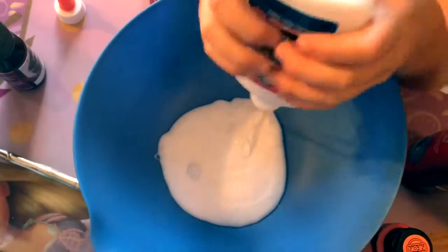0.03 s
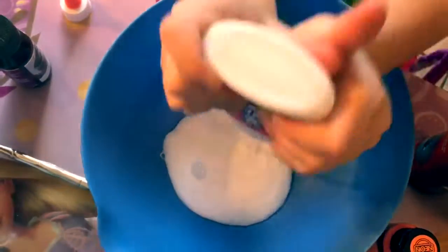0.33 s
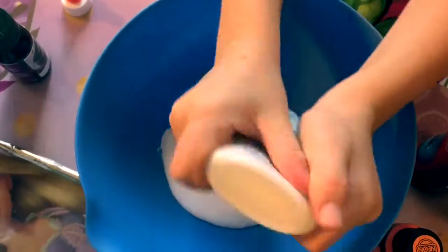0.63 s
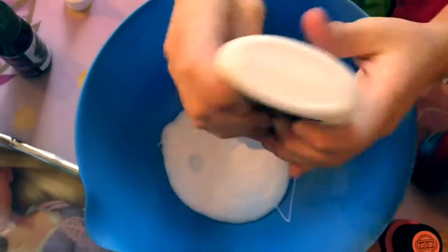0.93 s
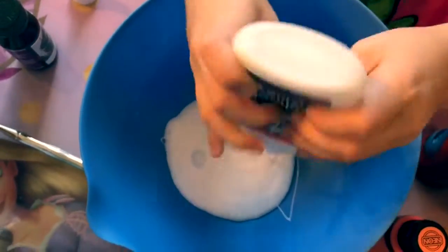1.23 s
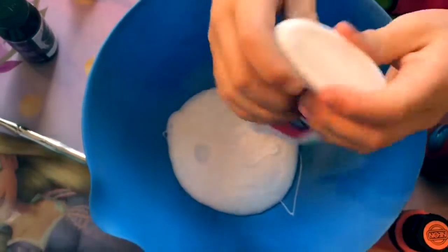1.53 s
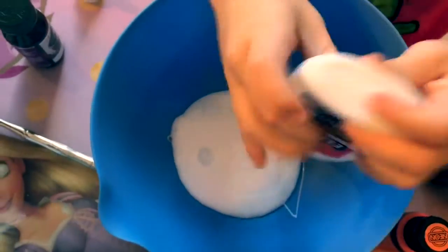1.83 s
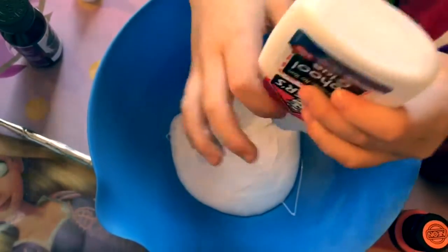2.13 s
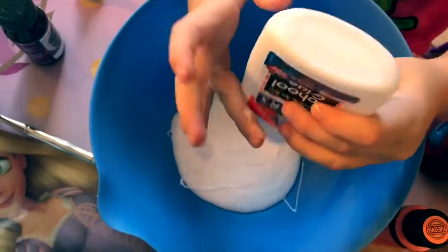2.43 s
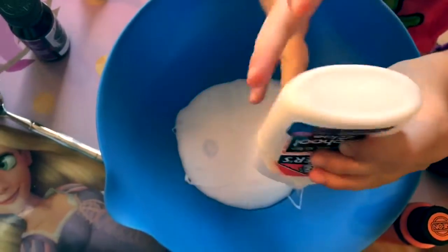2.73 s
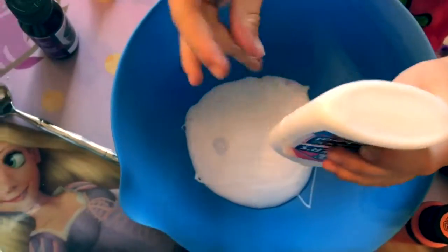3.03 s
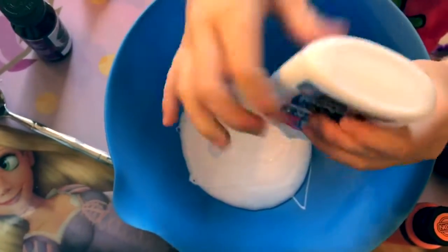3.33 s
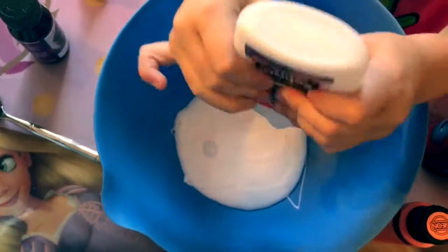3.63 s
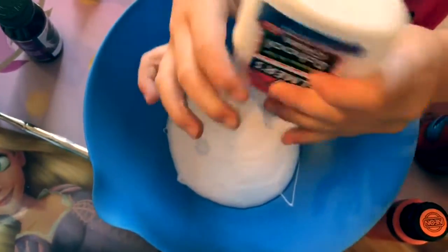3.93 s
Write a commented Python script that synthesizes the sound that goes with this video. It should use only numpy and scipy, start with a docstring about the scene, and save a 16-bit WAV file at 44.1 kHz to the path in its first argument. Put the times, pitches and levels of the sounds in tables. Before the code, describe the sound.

A plastic glue bottle is handled close to the microphone, clicking and crackling with short hollow thumps. Sharp clicks come in the first 0.3 seconds, followed by lighter scattered taps and faint finger rubbing, with firmer knocks near 2.1 and 2.7 seconds. Louder snaps and crackles cluster from 2.9 to 3.4 seconds and return at 3.9. A low hum runs underneath in the small, quiet room.

```python
"""Glue bottle over a mixing bowl

Close to the microphone, two hands turn, squeeze and pat an upside-down plastic glue bottle.
Skin rubs on the plastic, the wall flexes with hollow thumps, and cap and sticky fingers crackle.
The room is small and quiet, with a low hum, and rings briefly after each sound."""
import sys
import numpy as np
from scipy import signal
from scipy.fft import rfft, irfft, next_fast_len
from scipy.io import wavfile
from scipy.ndimage import uniform_filter1d

SR = 44100
rng = np.random.default_rng(int(sys.argv[2]) if len(sys.argv) > 2 else 0)


def generate_wav(signal):
    """Clip the signal to [-1, 1] and save it as 16-bit WAV at the path in sys.argv[1]."""
    frames = np.transpose(np.atleast_2d(signal))
    scaled = np.clip(frames, -1, 1) * 32767
    pcm = np.round(scaled).astype(np.int16)
    wavfile.write(sys.argv[1], SR, pcm)


N = 176400

# Still air in the room. Each row: frequency in Hz, relative level in dB.
AIR_SPECTRUM = [(15, -75.5), (25, -83), (80, -17), (137, -30.5), (166, -17.5), (277, -4.5), (317, -13.5),
                (354, -7.5), (476, -15), (641, -15), (818, -18.5), (1100, -23), (2000, -24.5),
                (2910, -31.5), (9070, -42), (14400, -46), (16000, -43)]
# The room's hum. Each row: centre in Hz, half-width in Hz, level in dB.
HUM_BANDS = [(76, 4.5, -61), (92, 12, -59), (129, 10.5, -65.5), (174, 3.7, -61), (349.1, 12.7, -51.5),
             (650, 4.5, -66), (880, 42, -69)]
# Fingers sliding on the plastic. Each row: peak time, rise and fall in seconds, level in dB,
# centre and width in Hz.
FINGER_STROKES = [(.005, 0.013, 0.066, -51, 6040, 7000), (.135, 0.0049, 0.015, -50.5, 3720, 1500),
                  (.595, 0.0099, 0.0054, -55.5, 3680, 1200), (.664, 0.0027, 0.016, -51.5, 10200, 9400),
                  (.81, 0.026, 0.009, -56.5, 5000, 7000), (1.005, .003, 0.023, -52, 11000, 8100),
                  (1.067, 0.01, 0.0093, -50, 7800, 910), (1.09, 0.016, 0.0089, -42, 6400, 1670),
                  (1.137, 0.0048, 0.0058, -41, 6040, 1000), (1.308, 0.0045, 0.038, -55, 9800, 12100),
                  (1.47, 0.098, 0.036, -70.5, 1080, 1420), (1.55, .025, 0.017, -63, 13900, 4000),
                  (2.36, 0.015, 0.016, -58.5, 3000, 4950), (2.561, 0.0046, 0.049, -59, 10700, 10100),
                  (3.083, 0.0037, 0.0085, -42, 12800, 5060), (3.619, 0.0048, 0.0015, -45, 6980, 300),
                  (3.66, .008, 0.042, -49, 8400, 1210), (3.779, 0.0025, 0.022, -36.5, 12500, 800),
                  (3.852, 0.045, 0.11, -49, 2780, 5000), (3.93, .01, .03, -43, 12500, 2020)]
# Flexes of the bottle wall. Each row: start in seconds, pitch in Hz, level in dB, swell in ms.
WALL_FLEXES = [(0.0785, 527, -10.5, 1.43), (0.135, 388, -15, 2.8), (.2470, 332, -24, 2.2),
               (0.259, 370, -15, 2.15), (0.4478, 390, -14, 3.1), (0.759, 380, -32.5, 2.7),
               (.8480, 335, -22, 2.53), (1.014, 343, -39, 2.3), (1.1440, 290, -21.5, 2.26),
               (1.692, 413, -31, 3.4), (1.8705, 298, -22.5, 5.4), (2.0567, 353, -14.5, 2.8),
               (2.6948, 407, -13.5, 1.43), (2.9701, 316, -21, 2.05), (3.1020, 437, -18, 1.8),
               (3.109, 269, -15.5, 2.6), (3.2440, 440, -19.5, 1.8), (3.2518, 370, -14.5, 2),
               (3.292, 302, -24.5, 4.2), (3.3790, 310, -9.5, 1.7), (3.646, 236, -35.5, 3.2),
               (3.9107, 390, -19.5, 2.9), (3.915, 319, -10, 1.84), (3.9196, 212, -24.5, 3.8)]
# Crackles of cap and bottle. Each row: peak time in seconds, rise and fall in ms, levels of the
# body, middle, edge and fizz bands (low to high) in dB, ring pitch in Hz, ring level in dB.
CAP_CLICKS = [(.0797, 0.45, 0.55, 24, 0.5, -44, -32, 3250, 0),
              (0.0802, 0.32, 1.3, 20, -23, -24, -25, 2530, 3.5),
              (0.2477, 1.7, 1.4, -10, -5, -9, -2, 9800, -5), (0.253, 1.6, 7.5, 15.5, 0, 3, 8.5, 7200, -2),
              (.2605, 1.2, 1.5, 7, -3, 2.5, 7, 4200, -6), (.2660, 1.4, 9, -18, -1.5, -1.5, 9, 7300, 10.5),
              (0.761, 0.37, 1.2, -2.5, -35, -25, -39, 6000, -39),
              (0.8554, 1.0, 5.1, -3, -8, -6.5, -3, 8500, -14),
              (0.858, 2.6, 2.5, -7, -5, -8.5, -4.5, 3940, 8),
              (0.861, 1.7, 2.5, 4.5, -11, -14.5, -13, 10800, -0.5),
              (1.0149, 0.33, 0.96, 4, -20, -18, -33, 6400, -18),
              (1.144, 1.9, 2.5, -2, -9, 0.5, -19.5, 6000, 3.5),
              (1.3086, 0.46, 4.7, -4.5, -19, -19.5, -25.5, 5700, -29),
              (1.34, .5, 1.5, -3, -21, -26.5, -33, 4000, -24),
              (1.4869, .3, 1.3, -4, -18, -32, -38, 1950, -20), (1.6930, 0.19, 2, 5, 2, -2, -8.5, 4150, -1),
              (1.7389, 0.25, 1.6, 3, 2, -15, -21, 1630, -8), (1.8718, .4, 1.3, 2, 0, -12, -20, 4270, 2.5),
              (1.8737, 1.3, 1.2, 5, -2, -5, -15, 1320, 4.5),
              (1.936, 1.0, 2.0, 3.5, -18, -23.5, -26, 4400, -17),
              (2.0561, 0.48, 1.13, 7.5, 3.5, 2.5, -3, 4110, 14),
              (2.0577, 0.69, 0.65, 5, 9, 9, -9, 1360, 11), (2.6975, 1.1, 3.0, 16, -1, -35, -35, 860, 1),
              (2.7063, 1.45, 2.9, 0, 0.5, -10, -10, 10800, 4), (2.7101, 2.4, 2.3, 6, 2, 2, -2.5, 3420, 4.5),
              (2.9147, 4.7, 3.2, 0, -19, -12.5, -9.5, 7000, -19),
              (2.924, 0.87, 2.4, -1, -20, -11, -10, 13900, -2),
              (2.9293, 0.86, 4.0, 5.5, -20, -3, -6, 10200, 3),
              (2.942, 8.2, 6.7, -20, -16, -7.5, 7.5, 6850, 4),
              (2.9640, 4.2, 5.6, 5.5, -8.5, 0.5, -2.5, 6170, 3),
              (3.0956, 0.75, 0.64, 14.5, -3, 8, -0.5, 7100, -7),
              (3.1030, 0.23, 1.5, 32.5, 11, 6.5, -10, 4800, 21), (3.1050, .5, 2.7, 0, 11, -5, -6, 1296, 18),
              (3.1079, 0.61, 0.55, 19.5, 2, 10.5, 8.5, 5700, 12),
              (3.1140, 3.5, 1.8, 1, -34, 9, 1, 6400, 9.5), (3.2442, .6, 4.5, 9, 1, -27, -3, 5100, -12),
              (3.2519, 0.083, 1.2, 22, 0, 15, 0, 4900, 20), (3.3702, 1.4, 3.8, 16, -12, -3, -1, 6400, -7),
              (3.3759, .4, 2.65, 25, 2, 12.5, 9, 5000, 17.5),
              (3.3785, 0.44, 2.4, -18, 16, 2, 12, 6650, 16.5), (3.385, 0.63, 3, -13, 3, -1, 8, 7300, -1),
              (3.6467, 5, 2.8, -2, -14, -4, 3.5, 5800, -1),
              (3.9118, 3.7, 0.99, 22.5, 1, -1, 9.5, 7800, 5.5),
              (3.916, 0.95, 4.6, 22.5, 6.5, 4, 9, 8400, 11)]
# Resonances of bottle and cap, heard in every click. Each row: centre and width in Hz, gain in dB.
PLASTIC_MODES = [(1746, 480, -2.5), (2480, 140, 1.5), (3230, 470, 3), (4520, 250, -5), (6470, 117, -33.5),
                 (8350, 133, -16.5), (10660, 170, -15.5), (14400, 1140, 8.5)]
# Tone of a fingertip letting go. Each row: frequency in Hz, gain in dB.
TICK_TONE = [(200, 3), (900, 16.5), (2500, 7), (6000, 3.5), (15000, -29.5)]
# Tone of the reflections. Each row: frequency in Hz, level in dB against the direct sound.
REFLECTION_TONE = [(100, -6), (330, -26), (550, -5.5), (720, -13.5), (870, -1), (1080, -11), (1400, -9),
                   (3000, -7.5), (6000, -9.5), (10000, -7), (16000, -13)]
# Resonances of bowl and room. Each row: pitch in Hz, gain in dB, T60 and delay in seconds.
BOWL_AND_ROOM_MODES = [(362, 0, .16, .0145), (326, -4, .18, .0155), (875, -12, .2, .008),
                       (975, -12, .18, .008)]


def undb(db):
    """Decibels to gain."""
    return 10 ** (np.asarray(db) / 20)


def unit_rms(x):
    """Scale to rms 1."""
    return x / np.sqrt(np.mean(x ** 2) + 1e-30)


def colour(x, points):
    """Causal, minimum-phase filter through (Hz, dB) points."""
    size = 2 * next_fast_len(len(x))
    hz, db = np.array(points, float).T
    freqs = np.maximum(np.fft.rfftfreq(size, 1 / SR), 1)
    gain = undb(np.interp(np.log(freqs), np.log(hz), db))
    cepstrum = irfft(np.log(gain))
    cepstrum[1:size // 2] *= 2
    cepstrum[size // 2 + 1:] = 0
    return irfft(rfft(x, size) * np.exp(rfft(cepstrum)))[:len(x)]


def flatten(burst):
    """Even out the broad spectrum of a burst and give it unit energy."""
    spectrum = rfft(burst)
    power = uniform_filter1d(np.abs(spectrum) ** 2, size=50)
    flat = irfft(spectrum / np.sqrt(power + 1e-12), len(burst))
    return flat / np.linalg.norm(flat)


def band(x, hz, width):
    """One resonance, gain 1 at its centre."""
    q = hz / min(width, SR / np.pi)
    return signal.lfilter(*signal.iirpeak(hz, q, fs=SR), x)


def add(out, x, start):
    """Mix x into out from a time in seconds."""
    i = int(round(start * SR))
    x, i = x[max(-i, 0):], max(i, 0)
    out[i:i + len(x)] += x[:max(len(out) - i, 0)]


def swell(t, rise, fall):
    """Steep rise up to t = 0, exponential fall after it."""
    return np.exp(-np.where(t < 0, np.abs(t / rise) ** 1.07, np.abs(t / fall)))


def room_tone(air_db=-52):
    """Still air all round the microphone, and narrow bands of noise that waver as a low hum."""
    out = undb(air_db) * unit_rms(colour(rng.standard_normal(N), AIR_SPECTRUM))
    freqs = np.fft.rfftfreq(N, 1 / SR)
    for hz, half_width, db in HUM_BANDS:
        hum_spectrum = rfft(rng.standard_normal(N)) / (1 + ((freqs - hz) / half_width) ** 2)
        out += undb(db) * unit_rms(irfft(hum_spectrum, N))
    return out


def finger_rubs(roughness=0.18):
    """Skin drags over the bottle in faint, grainy, sometimes squeaky strokes."""
    out, t = np.zeros(N), np.arange(N) / SR
    grain = np.exp(roughness * unit_rms(uniform_filter1d(rng.standard_normal(N), size=60)))
    for peak, rise, fall, db, hz, width in FINGER_STROKES:
        friction = rng.standard_normal(N) * grain
        drag = band(band(friction, hz, width), hz, 2 * width)
        out += undb(db) * swell(t - peak, rise, fall) * unit_rms(drag)
    return out


def wall_thumps():
    """The bottle wall flexes and, damped by the hand, swings for only a few cycles."""
    out, t = np.zeros(N), np.arange(SR // 20) / SR
    for start, hz, db, swell_ms in WALL_FLEXES:
        age = t * 1000 / swell_ms
        envelope = (age * np.exp(1 - age)) ** 3
        add(out, undb(db) * envelope * np.sin(2 * np.pi * hz * t), start)
    return out


def cap_clicks(roughness=0.54, grain_s=0.0004, lead_s=0.02):
    """Each click is a tight cluster of slips, coloured by the plastic, with a ring set by the grip."""
    out = np.zeros(N)
    t_ms = (np.arange(4096) / SR - lead_s) * 1000
    for peak, rise, fall, body, middle, edge, fizz, ring_hz, ring_db in CAP_CLICKS:
        slips, grain = rng.standard_normal((2, len(t_ms)))
        grain = unit_rms(uniform_filter1d(grain, int(grain_s * SR)))
        push = flatten(slips * np.exp(roughness * grain) * swell(t_ms, rise, fall))
        plastic = sum(undb(db) * band(push, hz, width) for hz, width, db in PLASTIC_MODES)
        shell = push + grip_resonances(push) + plastic
        tone = [(130, body - 16.5), (450, body - 2), (700, body - 2.5), (870, body), (1030, body - 2),
                (1260, middle), (1800, middle), (2600, (middle + edge) / 2 - 4.5),
                (3400, edge - 2), (6000, edge), (9000, fizz), (15000, fizz - 11.5)]
        crackle = colour(shell / np.linalg.norm(shell), tone)
        ring_width = 0.13 * ring_hz
        ring = band(band(push, ring_hz, ring_width), ring_hz, 4 * ring_width)
        ring *= undb(ring_db) * np.sqrt(np.pi * ring_width / SR) / np.linalg.norm(ring)
        add(out, crackle + ring, peak - lead_s)
    return out


def grip_resonances(push, low_hz=5000, high_hz=15500):
    """Every grip leaves other small, high resonances of the plastic free to ring."""
    pitches = rng.uniform(low_hz, high_hz, size=9)
    return undb(5) * sum(band(push, hz, width=300) for hz in pitches)


def sticky_ticks(per_second=12, count=200, fall_s=0.00066, spread_db=2):
    """Tacky fingertips let go of the plastic at random moments."""
    out, t = np.zeros(N), np.arange(SR // 100) / SR
    starts = rng.random(count) * count / per_second
    for start, db in zip(starts, rng.normal(-39, spread_db, count)):
        tick = rng.standard_normal(len(t)) * np.exp(-t / fall_s)
        add(out, undb(db) * tick / np.linalg.norm(tick), start)
    return colour(out, TICK_TONE)


def small_room(direct, early_t60_s=0.26, late_t60_s=0.63, late_db=-8.5):
    """Table and walls reflect quickly, a fainter tail lingers, and bowl and room ring low."""
    t = np.arange(int(0.8 * SR)) / SR
    early, late = (np.exp(-np.log(1000) * t / t60) / np.sqrt(t60) for t60 in (early_t60_s, late_t60_s))
    tail = rng.standard_normal(len(t)) * np.hypot(early, undb(late_db) * late)
    response = np.zeros(len(t))
    add(response, colour(tail / np.linalg.norm(tail), REFLECTION_TONE), start=0.0046)
    for hz, db, t60, delay in BOWL_AND_ROOM_MODES:
        decay_rate = np.log(1000) / t60
        mode = np.exp(-decay_rate * t) * np.sin(2 * np.pi * hz * t)
        add(response, undb(db) * 2 * decay_rate / SR * mode, delay)
    return direct + signal.fftconvolve(direct, response)[:N]


def scene(low_cut_hz=91):
    """One microphone close to the bottle, which is too small to radiate deep bass; the room behind."""
    handling = wall_thumps() + cap_clicks() + finger_rubs() + sticky_ticks()
    low_cut = signal.butter(2, low_cut_hz, "high", fs=SR, output="sos")
    bottle = signal.sosfilt(low_cut, handling)
    return (small_room(bottle) + room_tone())[None]


def record(dry, ceiling=0.72, top_hz=16000):
    """The recorder rounds the highest peaks and cuts the top."""
    rounded = dry / (1 + (dry / ceiling) ** 4) ** (1 / 4)
    high_cut = signal.ellip(10, 0.2, 80, top_hz, fs=SR, output="sos")
    return signal.sosfilt(high_cut, rounded)


dry = scene()
out = record(dry)
generate_wav(out)
```